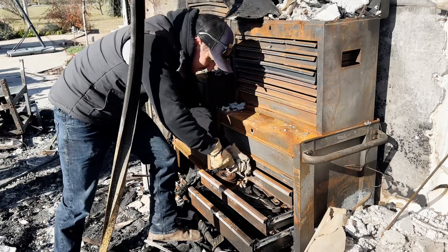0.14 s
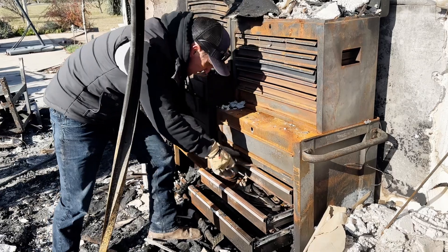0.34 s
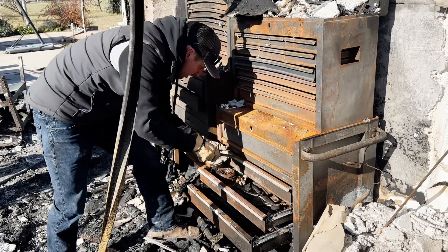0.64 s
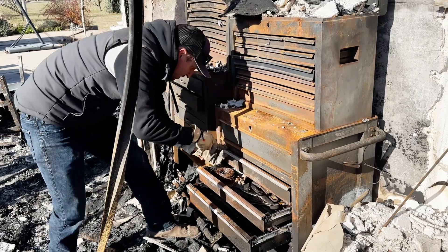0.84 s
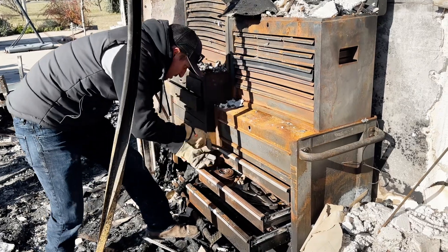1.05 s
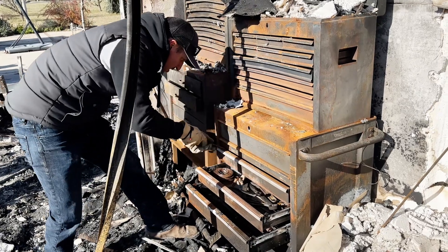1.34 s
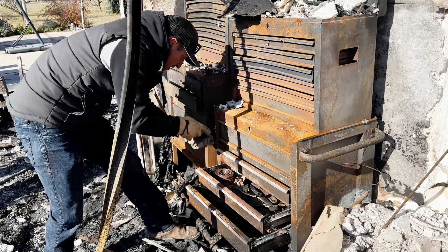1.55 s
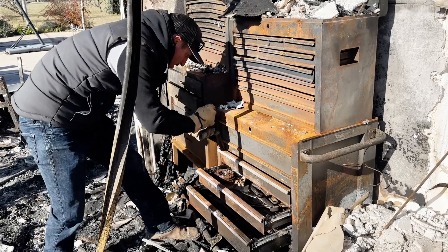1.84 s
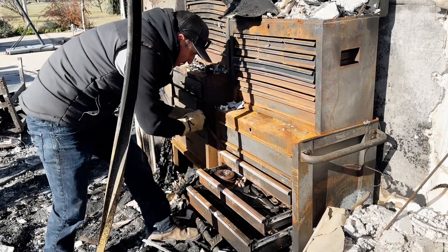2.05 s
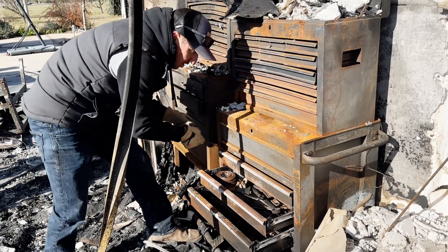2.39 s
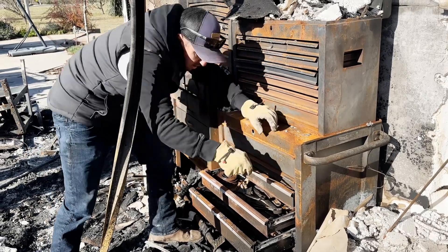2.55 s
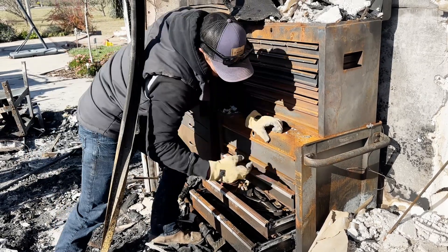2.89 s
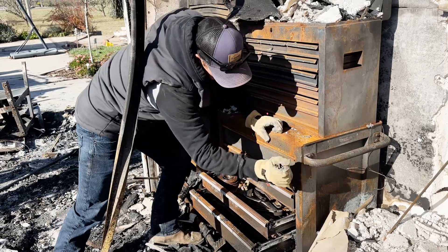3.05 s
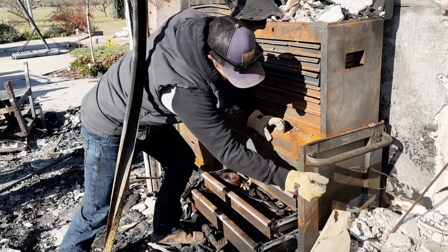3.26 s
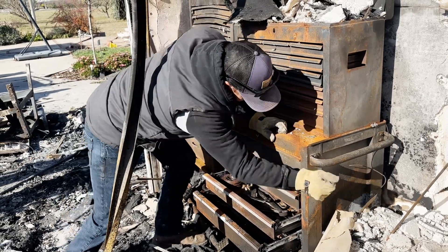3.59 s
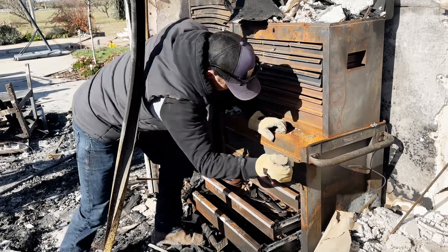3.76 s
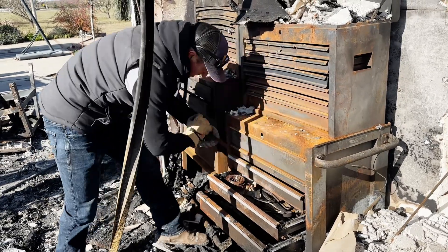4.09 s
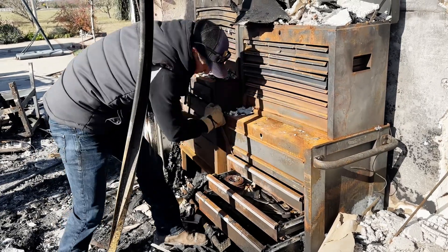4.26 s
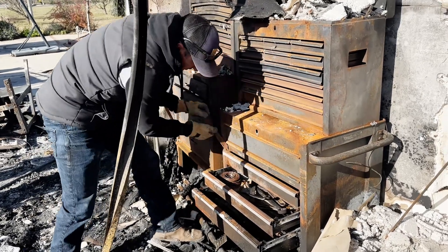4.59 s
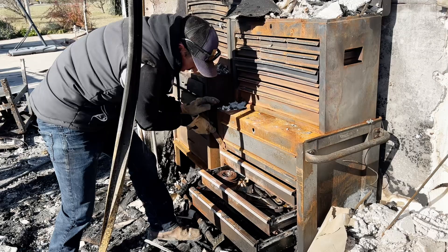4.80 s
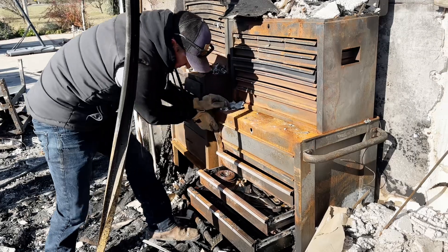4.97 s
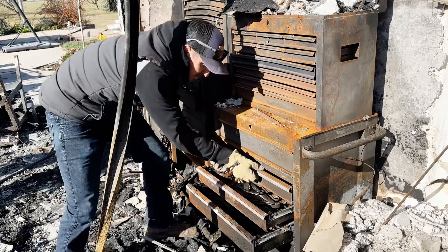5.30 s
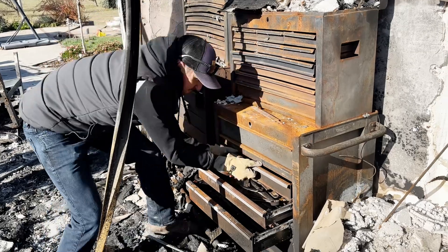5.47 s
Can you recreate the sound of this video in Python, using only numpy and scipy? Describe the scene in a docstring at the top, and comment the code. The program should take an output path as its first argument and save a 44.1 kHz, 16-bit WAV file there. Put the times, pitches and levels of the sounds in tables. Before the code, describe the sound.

Close stereo pickup outdoors of a rusty steel tool chest being searched. From about 0.2 s, gritty scrapes and dull knocks begin, with a short drawer groan near 0.3 s and a bright clink at 0.7 s. Around 1.0 to 1.3 s come a hollow plate-like clink and a sharp clack, then a deep thud at 1.65 s. Lighter scrapes, ticks and knocks continue, including a crisp knock at 2.25 s and a brief juddering groan near 2.85 s. From 3.35 to 3.8 s a stuck drawer is jerked, giving a dense burst of hard clanks, rattles and low thuds. Sparse knocks and faint dragging follow, with a ringing double clack at 5.05 s. At 5.3 s a drawer slams with the loudest booming clank and a short rattle, then small scrapes and knocks. Far traffic murmurs throughout while a distant car fades away.

```python
"""Outdoors, gloved hands rummage through rusty tools in the steel drawers of a tool chest.
Tools drag over grit, knock on the sheet steel and clink; a stuck drawer is jerked several times,
and near the end one is slammed home with a loud clank. Far traffic murmurs and a far car recedes.
Bursts of tiny impacts shake fading steel tones to make the drags, clacks and clinks; plain fading
tones make the booms and thuds, and coloured noise makes the traffic."""
import sys
import numpy as np
from scipy import signal
from scipy.fft import rfft, irfft, next_fast_len
from scipy.io import wavfile

SR = 44100
rng = np.random.default_rng(int(sys.argv[2]) if len(sys.argv) > 2 else 0)


def generate_wav(sig):
    """Save sig (samples, or channels by samples) to the path in sys.argv[1] as 16-bit PCM at SR."""
    pcm = np.round(np.clip(np.atleast_2d(sig).T, -1, 1) * 32767).astype(np.int16)
    wavfile.write(sys.argv[1], SR, pcm)


N = 248679
RING_TIME = np.arange(SR // 4) / SR
SHORT_RING_TIME = RING_TIME[:SR // 10]


def from_db(db):
    """Turn decibels into gain."""
    return 10 ** (np.asarray(db) / 20)


def rms_one(x):
    """Scale to an rms of 1."""
    return x / np.sqrt(np.mean(x ** 2) + 1e-20)


def at_level(x, db):
    """Give a short sound the energy of 40 ms at this level."""
    return x * from_db(db) * np.sqrt(.04 * SR / (np.sum(x ** 2) + 1e-20))


def at_hz(points, hz):
    """Read a table between its points, on a log-frequency axis."""
    f, value = np.transpose(points)
    return np.interp(np.log(hz), np.log(f), value)


def add(out, s, sound):
    """Mix a sound in, starting at s seconds."""
    start = max(0, round(s * SR))
    out[start:start + len(sound)] += sound[:N - start]


def ring(hz, fade_s, time=RING_TIME):
    """A struck tone that falls by 60 dB in fade_s."""
    return np.sin(2 * np.pi * hz * time) * np.exp(-np.log(1000) * time / fade_s)


def coloured(spectrum, size):
    """Noise shaped by a spectrum, with an rms of 1."""
    hz = np.arange(size // 2 + 1) * SR / size + 1
    white = rfft(rng.standard_normal(size))
    return rms_one(irfft(white * from_db(at_hz(spectrum, hz)), size))


def grains(size, per_s, spread_db):
    """Tiny impacts of random sign and uneven strength."""
    born = rng.random(size) < per_s / SR
    extra_db = spread_db * np.minimum(rng.exponential(1, size), 4)
    return born * rng.choice([-1, 1], size) * from_db(extra_db)


def catches(size, per_s, catch_db, release_s=0.002):
    """A moving tool snags on debris: brief surges of force at random moments."""
    snags = (rng.random(size) < per_s / SR) * rng.uniform(.5, 1, size)
    surge = signal.lfilter([1], [1, -np.exp(-1 / (release_s * SR))], snags)
    return 1 + from_db(catch_db) * surge


def contact(length, rise=0.8, fall=0.81, chatter_db=-16, chatter_s=0.02):
    """Rusty steel bites, lets go and chatters on; returns the impacts and the seconds before their peak."""
    lead = .06
    t = np.arange(-lead, .12, 1 / SR)
    # rise and fall are shares of the contact length
    swell = np.exp(-(np.maximum(-t / rise, t / fall) / length) ** 2)
    chatter = from_db(chatter_db) * np.exp(np.minimum(t / rise / length, -t / chatter_s))
    return (swell + chatter) * grains(len(t), per_s=12000, spread_db=3.5), lead


def strike(modes):
    """Each spot on the steel excites the modes with strengths and signs of its own; rms 1."""
    weights = rng.choice([-1, 1], len(modes)) * from_db(2 * rng.standard_normal(len(modes)))
    return rms_one(weights @ modes)


def shaken(force, modes, count=2):
    """Rough steel touches at several spots at once, and each tiny impact lands on one of them."""
    spot = rng.integers(0, count, len(force))
    return sum(signal.fftconvolve(force * (spot == k), strike(modes)) for k in range(count))


# the steel's crowd of short-lived tones: pitch_hz, level_db (per Hz, relative)
STEEL = [(160, -2), (300, 7.5), (600, 0), (950, 2.5), (1250, -5.5), (1550, -20), (1850, -4), (2500, -10.5),
         (3200, -6), (4500, -13), (7500, -17.5), (9500, -14.5), (11300, -31), (13000, -24.5), (15500, -27)]
# how long they last: pitch_hz, fade_s (time to fall 60 dB)
STEEL_FADE = [(200, 0.19), (1000, 0.042), (3000, 0.017), (12000, 0.0055)]


def crowded_modes(band, count):
    """Closely spaced, short-lived steel modes across a band in Hz, one row each."""
    low_hz, high_hz = band
    pitches = low_hz + (np.arange(count) + rng.random(count)) * (high_hz - low_hz) / count
    rows = []
    for hz, fade_s in zip(pitches, at_hz(STEEL_FADE, pitches)):
        # a short-lived mode starts louder, to carry as much energy
        rows.append(from_db(at_hz(STEEL, hz)) * ring(hz, fade_s, SHORT_RING_TIME) / np.sqrt(fade_s))
    return np.array(rows)


# the clear tones of the sheet steel, some long and some short: pitch_hz, level_db (relative), fade_s
PANEL_MODES = [(252, -8.5, 0.35), (290.6, -4.5, 0.25), (344.7, -6.5, 0.3), (422, -13, 0.36),
               (535, -2, 0.019), (616, -19.5, 0.43), (676.7, -4, 0.08), (780, 2, 0.055), (857, -3.5, 0.061)]


def sheet_modes():
    """The clear modes of the sheet steel panels, one row each."""
    return np.array([from_db(db) * ring(hz, fade_s) for hz, db, fade_s in PANEL_MODES])


# tones of the drawer body, under hard blows and, faintly, dragged tools: pitch_hz, level_db (relative)
DRAWER_MODES = [(690, 7.5), (1035, 2), (1820, -9.5), (2920, -6), (3110, 0.5), (3780, -2.5), (4580, -12),
                (5250, -6), (6320, -13), (8550, -9)]


def drawer_modes(fade_s=.06):
    """The clear modes of the drawer body, one row each."""
    return np.array([from_db(db) * ring(hz, fade_s, SHORT_RING_TIME) for hz, db in DRAWER_MODES])


# colour of the street's murmur: pitch_hz, level_db (per Hz, relative)
STREET = [(25, -17.5), (64, -2), (127, -7.5), (212, -16), (439, -22.5), (900, -22), (1500, -35.5),
          (2900, -42.5), (8000, -51.5), (16000, -79.5)]
STREET_DB = -41.5


def street(side_db=-5, bass_side_db=-12, wide_hz=700):
    """Far traffic is noise, nearly alike at both ears in the bass and wider above."""
    noise = coloured(STREET, size=next_fast_len(N))[:N]
    wide = signal.sosfilt(signal.butter(1, wide_hz, "high", fs=SR, output="sos"), noise)
    side = from_db(bass_side_db) * (noise - wide) + from_db(side_db) * wide
    middle = coloured(STREET, size=next_fast_len(N))[:N]
    return from_db(STREET_DB) * (middle + np.array([side, -side]))


# colour of the far car: pitch_hz, level_db (per Hz, relative)
CAR = [(550, -27.5), (880, -0.5), (1250, -14), (1520, -15), (1750, -17.5), (3300, -32.5), (12000, -49.5)]
CAR_START_DB, CAR_FADE_DB_PER_S = -46.5, 4


def car(waver_db=-1.0, wavers_per_s=7, side_db=-7):
    """Tyre noise wavers in level as it fades into the distance."""
    t = np.arange(N) / SR
    waver = np.interp(t * wavers_per_s, np.arange(100), rng.standard_normal(100))
    middle, side = (coloured(CAR, size=next_fast_len(N))[:N] for _ in range(2))
    gain = from_db(CAR_START_DB - CAR_FADE_DB_PER_S * t + waver_db * waver)
    return gain * (middle + from_db(side_db) * np.array([side, -side]))


# a hand drags things along a drawer: start_s, end_s, rasp_db
SCRAPES = [(0.22, 0.333, -55), (0.5, 0.555, -32.5), (0.571, 0.638, -39.5), (0.806, 0.921, -46.5),
           (0.935, 1.084, -46.5), (1.165, 1.258, -35.5), (1.256, 1.36, -44.5), (1.385, 1.568, -51),
           (1.57, 1.671, -43), (1.799, 1.841, -41.5), (2.017, 2.053, -41.5), (1.902, 1.984, -53.5),
           (2.381, 2.499, -59), (2.74, 2.77, -44), (2.83, 2.949, -47), (3.036, 3.072, -43),
           (3.099, 3.147, -44.5), (3.233, 3.263, -40.5), (3.377, 3.92, -53.5), (4.343, 4.375, -45),
           (4.383, 4.465, -56.5), (4.704, 4.999, -54), (5.006, 5.067, -38), (5.29, 5.335, -36.5),
           (5.434, 5.663, -48.5)]
# the panel rumble grows more slowly than the rasp as the hand presses harder
USUAL_RASP_DB, USUAL_RUMBLE_DB, RUMBLE_FOLLOWS = -44.5, -36, 0.67
# the tool skids just before and after each blow, at levels set against the blow's own
SKID_BEFORE_S, SKID_AFTER_S, SKID_RUMBLE_DB, SKID_RASP_DB = .008, 0.04, -10, -16


def strokes():
    """The long drags, whose rumble follows their rasp: start_s, end_s, rumble_db, rasp_db."""
    rows = []
    for start, end, rasp in SCRAPES:
        rumble = USUAL_RUMBLE_DB + RUMBLE_FOLLOWS * (rasp - USUAL_RASP_DB)
        rows.append((start, end, rumble, rasp))
    return rows


def skids():
    """The short slide around each blow: start_s, end_s, rumble_db, rasp_db."""
    return [(s - SKID_BEFORE_S, s + SKID_AFTER_S, panel_db + SKID_RUMBLE_DB, clack_db + SKID_RASP_DB)
            for s, _, panel_db, clack_db in KNOCKS]


def dragging(panel, clack, grit, rumble_db=-2.0, rasp_db=-1.0, grit_db=-6.0, sheet_db=-6.0,
             drawer_db=-7, edge_s=0.008, fade_db=2.2):
    """Sliding over rust and grit: dense grains, sticking and slipping, shake the steel."""
    out, sheet, drawer = np.zeros(N), sheet_modes(), drawer_modes()
    for start, end, rumble, rasp in strokes() + skids():
        t = np.arange(start - .05, end + .05, 1 / SR)
        # a stroke swells, loses pressure as it goes, and stops
        swell = (1 + np.tanh((t - start) / edge_s / 2)) / 2
        stop = (1 + np.tanh((end - t) / edge_s / 2)) / 2
        stroke = swell * stop * from_db(-fade_db * (t - start) / (end - start))
        force = grains(len(t), per_s=14000, spread_db=3)
        force = force * catches(len(t), per_s=130, catch_db=6)
        # the drawer is shaken twice, each time at fresh spots
        parts = [(sheet, rumble + sheet_db), (panel, rumble + rumble_db),
                 (drawer, rasp + drawer_db), (drawer, rasp + drawer_db),
                 (clack, rasp + rasp_db), (grit, rasp + grit_db)]
        for modes, db in parts:
            sound = shaken(force * stroke, modes)
            add(out, t[0], from_db(db) * sound * np.linalg.norm(stroke) / np.linalg.norm(sound))
    return out


# small bits of metal click against each other: start_s, level_db
TICKS = [(0.576, -42), (1.407, -50.5), (1.626, -45), (1.711, -50.5), (1.772, -49.5), (2.011, -48),
         (2.243, -43), (2.395, -57.5), (2.67, -49.5), (2.801, -51), (3.601, -48), (3.786, -38.5),
         (4.123, -51), (4.397, -49), (4.58, -53), (4.659, -50), (4.751, -49.5), (5.017, -42), (5.181, -47)]
TICK_CONTACT_S, TICK_GRIT_DB = 0.0016, -10
STRAY_TICKS_PER_S, STRAY_TICK_DB = 22, -2


def stray_ticks():
    """Screws and sockets nudged by a stroke tick at random, unevenly strong: start_s, level_db."""
    rows = []
    for start, end, rasp in SCRAPES:
        count = round((end - start) * STRAY_TICKS_PER_S)
        for when, weakness in rng.random((count, 2)):
            db = min(rasp, USUAL_RASP_DB) + STRAY_TICK_DB - 10 * weakness
            rows.append((start + (end - start) * when, db))
    return [row for row in rows if row[0] < N / SR]


def ticks(clack, grit):
    """A light, very short contact sounds only the high modes."""
    out = np.zeros(N)
    for s, level in TICKS + stray_ticks():
        impacts, lead = contact(TICK_CONTACT_S, rise=0.42, fall=1.0, chatter_db=-15, chatter_s=0.011)
        for modes, db in [(clack, level), (grit, level + TICK_GRIT_DB)]:
            add(out, s - lead, at_level(shaken(impacts, modes), db))
    return out


# loose pieces tumble during a stroke: rate, levels against the stroke, spread either way, panel pitches
TAPS_PER_S, TAP_RUMBLE_DB, TAP_RASP_DB, TAP_SPREAD_DB, TAP_HZ = 6, -2.5, 1.5, 5, (246, 679)


def taps():
    """Uneven blows from pieces that a stroke tips over: start_s, pitch_hz, panel_db, clack_db."""
    rows = []
    for start, end, rumble, rasp in strokes():
        count = round((end - start) * TAPS_PER_S)
        for k, (when, spot, force) in enumerate(rng.random((count, 3))):
            db = TAP_SPREAD_DB * (2 * force - 1)
            s = start + (end - start) * (k + when) / count
            hz = np.interp(spot, (0, 1), TAP_HZ)
            rows.append((s, hz, rumble + TAP_RUMBLE_DB + db, rasp + TAP_RASP_DB + db))
    return [row for row in rows if row[0] < N / SR]


# a harder blow has a shorter contact and crunches more rust
USUAL_CLACK_DB, USUAL_CONTACT_S, CONTACT_SHORTENS = -39.5, 0.006068, .17
GRIT_BELOW_CLACK_DB, GRIT_PER_HARDNESS = 4.5, 0.33


def blows():
    """All knocks and taps: start_s, contact_s, pitch_hz, panel_db, clack_db, grit_db."""
    rows = []
    for s, hz, panel_db, clack_db in KNOCKS + taps():
        length = USUAL_CONTACT_S * from_db(CONTACT_SHORTENS * (USUAL_CLACK_DB - clack_db))
        grit_db = clack_db - GRIT_BELOW_CLACK_DB + GRIT_PER_HARDNESS * (clack_db - panel_db)
        rows.append((s, length, hz, panel_db, clack_db, grit_db))
    return rows


# blows on the drawers: start_s, pitch_hz (main panel tone), panel_db, clack_db
KNOCKS = [(0.313, 288, -38.5, -53), (0.637, 345, -37.5, -65), (0.708, 291, -34.5, -39),
          (1.024, 813, -34.5, -39), (1.075, 790, -43, -42.5), (1.223, 810, -39, -26.5),
          (1.317, 495, -39, -42.5), (1.479, 531, -37, -47), (1.532, 318, -36, -44.5),
          (1.586, 537, -33, -44.5), (1.649, 1062, -25, -41.5), (1.805, 305, -35, -42.5),
          (2.011, 693, -38, -53.5), (2.253, 566, -34, -32.5), (2.304, 368, -34.5, -40.5),
          (2.509, 230, -41, -50.5), (2.646, 350, -30, -44), (2.835, 264, -37.5, -40),
          (2.862, 307, -37.5, -47), (3.052, 694, -36, -38.5), (3.223, 630, -35.5, -52.5),
          (3.351, 823, -31, -42), (3.448, 367, -22, -28.5), (3.528, 616, -24.5, -25),
          (3.541, 794, -25, -27), (3.62, 698, -20, -26), (3.707, 940, -21, -26), (3.759, 883, -30, -40),
          (3.775, 250, -31.5, -30.5), (4.14, 296, -39, -49.5), (4.152, 514, -40, -52),
          (4.193, 694, -36.5, -46.5), (4.211, 740, -40.5, -57), (4.361, 723, -29, -36.5),
          (4.414, 913, -40, -43.5), (4.56, 397, -40.5, -49), (4.79, 258, -37.5, -45.5),
          (4.883, 816, -40.5, -47.5), (5.037, 316, -27.5, -33.5), (5.053, 520, -28.5, -35.5),
          (5.291, 341, -18, -24.5), (5.469, 273, -33.5, -46.5), (5.558, 760, -35, -44),
          (5.637, 760, -35, -38)]


def knocks(panel, clack, grit, sheet_db=-6, main_db=-4.0, crowd_db=-1.5, main_fade_s=0.051, push_s=0.0008):
    """Each blow booms in the panel that it hits, clacks in the tool and crunches the rust."""
    out, sheet = np.zeros(N), sheet_modes()
    push = 1 - np.exp(-RING_TIME / push_s)
    for s, length, hz, panel_level, clack_level, grit_level in blows():
        # the weight of the tool gives the panel one push
        boom = at_level(push * ring(hz, main_fade_s), main_db)
        boom = boom + at_level(push * strike(sheet), sheet_db)
        add(out, s - .002, from_db(panel_level) * boom)
        # the rough contact rattles all the higher modes
        impacts, lead = contact(length)
        for modes, db in [(panel, panel_level + crowd_db), (clack, clack_level), (grit, grit_level)]:
            add(out, s - lead - .0015, at_level(shaken(impacts, modes), db))
    return out


# a drawer judders along its runners: start_s, end_s, level_db
GROANS = [(0.313, 0.37, -37.5), (2.84, 2.875, -32.5), (2.892, 2.935, -31)]
GROAN_HZ = 267


def groans(fade_s=0.027, jitter=0.091):
    """The runner sticks and slips in step with the drawer floor, a little unevenly."""
    out = np.zeros(N)
    for start, end, db in GROANS:
        slips = np.zeros(round((end - start) * SR))
        when = np.cumsum(1 + jitter * rng.standard_normal(size=40)) * SR / GROAN_HZ
        slips[when[when < len(slips)].astype(int)] = 1
        add(out, start, at_level(signal.fftconvolve(slips, ring(GROAN_HZ, fade_s)), db))
    return out


# a blow rocks the heavy chest only a little: level against the blow, and its upper limit
KNOCK_JOLT_DB, KNOCK_JOLT_LIMIT_DB = -8.5, -36


def jolts(low_hz=70, high_hz=105):
    """What each knock passes on to the whole chest: start_s, pitch_hz, level_db."""
    return [(s, rng.uniform(low_hz, high_hz), min(panel_db + KNOCK_JOLT_DB, KNOCK_JOLT_LIMIT_DB))
            for s, _, panel_db, _ in KNOCKS]


# the chest shifts under the weight of the arms, or the jerked drawer meets its stop:
# start_s, pitch_hz, level_db
THUDS = [(0.324, 118, -30), (0.832, 87, -35), (1.649, 46, -23.5), (1.83, 94, -31), (2.079, 61.5, -33),
         (3.351, 84, -36.5), (3.394, 104, -29), (3.454, 88, -25), (3.547, 78, -23), (3.642, 74.5, -25.5),
         (3.722, 91, -31), (4.5, 51, -38.5), (5.295, 93, -30)]
DRAWER_FADE_S, FRAME_FADE_S, WALL_FADE_S = .12, .35, .02


def thuds(frame_hz=75, frame_db=-5, wall_hz=125, wall_db=-5):
    """A jolt rocks the drawer, the frame and a side wall, each with a low tone."""
    out, time = np.zeros(N), np.arange(SR) / SR
    for s, hz, db in THUDS + jolts():
        add(out, s, at_level(ring(hz, DRAWER_FADE_S, time), db))
        frame = ring(frame_hz * rng.uniform(0.86, 1.15), FRAME_FADE_S, time)
        add(out, s, at_level(frame, db + frame_db))
        # the wall swings against the drawer, so the deepest bass partly cancels
        wall = -ring(wall_hz * rng.uniform(1.0, 1.07), WALL_FADE_S, time)
        add(out, s, at_level(wall, db + wall_db))
    return out


# what each loose tool, or a panel plate that rings out, rings with, by name: pitch_hz, level_db (relative)
TOOLS = {"wrench": [(2880, 1.5), (3330, -16), (3765, 1), (4230, -7), (5200, -9.5), (6325, -15), (7820, -18),
         (9400, -12.5)], "socket": [(3570, 1), (5220, -0.5), (5430, -11), (7100, 5.5), (8970, -4.5)],
         "runner": [(2790, 3.5), (3150, 21), (5710, 3.5)], "pliers": [(2500, 6), (3850, -9)],
         "plate": [(829, 0), (2202, -11.5)]}
# ring time of the lowest tone of each tool or plate, by name: fade_s
TOOL_FADE = {"wrench": .15, "socket": .06, "runner": .018, "pliers": .09, "plate": .06}
# a tool or a panel plate is set ringing: start_s, tool (name), contact_s, level_db
CLINKS = [(0.702, "runner", 0.00044, -38.5), (0.846, "wrench", 0.045, -44.5), (1.024, "plate", 0.0021, -27),
          (2.742, "socket", 0.011, -36), (3.252, "wrench", 0.0033, -40), (3.508, "runner", 0.0022, -29.5),
          (4.413, "plate", 0.003, -39), (5.048, "wrench", 0.012, -41.5), (5.177, "pliers", 0.0048, -47)]


def clinks():
    """A tool that comes free, or a panel plate that is struck, rings with its own clear modes; the higher ones
    die sooner."""
    out = np.zeros(N)
    for s, tool, length, db in CLINKS:
        impacts, lead = contact(length)
        lowest_hz = TOOLS[tool][0][0]
        tone = 0
        for hz, level in TOOLS[tool]:
            mode = ring(hz, TOOL_FADE[tool] * lowest_hz / hz)
            tone = tone + at_level(signal.fftconvolve(impacts, mode), level)
        add(out, s - lead, at_level(tone, db))
    return out


# after a hard blow the loose tools bounce on for a moment
HARD_CLACK_DB = -31
BOUNCE_GAP_S, BOUNCE_DB, BOUNCE_LOSS_DB = .014, -23, 5.5


def clanks(clack, ring_db=-4):
    """A hard blow rings the drawer body, and the tools in it bounce unevenly, weaker each time."""
    out, drawer = np.zeros(N), drawer_modes()
    for s, _, _, level in KNOCKS:
        if level > HARD_CLACK_DB:
            add(out, s, at_level(strike(drawer), level + ring_db))
            gaps = BOUNCE_GAP_S * np.cumsum(.5 + rng.random(size=4))
            for k, gap in enumerate(gaps):
                impacts, lead = contact(TICK_CONTACT_S)
                bounce = shaken(impacts, clack) + shaken(impacts, drawer)
                add(out, s + gap - lead, at_level(bounce, level + BOUNCE_DB - BOUNCE_LOSS_DB * k))
    return out


# tones of the drawer that is slammed home: pitch_hz, level_db (relative), fade_s
SLAM_MODES = [(306, -7, .13), (349, 0, .16), (428, -7, .08), (512, -10, .07), (582, -9, .1), (690, -8, .1),
              (755, -10, .1), (856, -12, .12), (1010, -8, .09), (1244, -15, .09)]
SLAM_S, SLAM_DB = 5.2885, -14.5


def slam(panel, clack, buzz_db=-9, rattle_db=-16, rattle_fade_s=0.16):
    """The slammed drawer clangs, and the tools in it keep bouncing on its floor as the clang dies."""
    out = np.zeros(N)
    clang = 0
    for k, (hz, db, fade_s) in enumerate(SLAM_MODES):
        clang = clang + (-1) ** k * at_level(ring(hz, fade_s), db)
    add(out, SLAM_S, at_level(clang, SLAM_DB))
    size = len(RING_TIME)
    bounces = grains(size, per_s=5000, spread_db=2.5) * catches(size, per_s=140, catch_db=9)
    bounces = bounces * from_db(-60 * RING_TIME / rattle_fade_s)
    # the heavy tools rattle more dully than a single sharp blow
    dull = signal.sosfilt(signal.butter(2, 1700, fs=SR, output="sos"), bounces)
    for force, modes, db in [(bounces, panel, buzz_db), (dull, clack, rattle_db)]:
        add(out, SLAM_S, at_level(shaken(force, modes), SLAM_DB + db))
    return out


def surroundings(x, fade_s=0.12, echo_db=-13, dull_hz=6500):
    """The hollow chest and the wall behind it scatter a short tail, different at each ear."""
    decay = np.exp(-np.log(1000) * RING_TIME / fade_s) * (RING_TIME > .002)
    tail = rng.standard_normal((2, len(RING_TIME))) * decay
    tail /= np.linalg.norm(tail, axis=1, keepdims=True)
    tail = signal.sosfilt(signal.butter(2, dull_hz, fs=SR, output="sos"), tail)
    tail = signal.sosfilt(signal.butter(1, 900, "high", fs=SR, output="sos"), tail)
    return from_db(echo_db) * signal.fftconvolve(x[None], tail, axes=1)[:, :N]


# how far left leads right at the two microphone ports: pitch_hz, lead_radians
PORT_PHASE = [(100, 0), (2100, .2), (3400, 1), (6200, 1.05), (7600, 2.1), (8200, -.4), (9500, -1.3),
              (10800, -3.1), (11500, -3.2), (12800, -4.5), (14000, -6.28)]
# how much louder left is than right: pitch_hz, level_db
PORT_BALANCE = [(300, 0), (750, 3.5), (1300, 7), (2400, 3), (3200, -2.5), (4800, 4), (7600, 0.5)]


def placed(x):
    """Sound from the chest reaches the two ports with a lag and level that depend on pitch."""
    size = next_fast_len(N + SR // 10)
    hz = np.arange(size // 2 + 1) * SR / size + 1
    # each side takes half of the difference
    lean = from_db(at_hz(PORT_BALANCE, hz) / 2) * np.exp(.5j * at_hz(PORT_PHASE, hz))
    return irfft(rfft(x, size) * np.array([lean, 1 / lean]), size)[:, :N]


PANEL_BAND_HZ, CLACK_BAND_HZ, GRIT_BAND_HZ = (150, 1300), (1300, 6000), (6000, 16500)


def scene():
    """All the handling sounds come from the chest, over the street and the far car."""
    panel = crowded_modes(PANEL_BAND_HZ, count=70)
    clack = crowded_modes(CLACK_BAND_HZ, count=160)
    grit = crowded_modes(GRIT_BAND_HZ, count=220)
    parts = [dragging(panel, clack, grit) + groans(),
             ticks(clack, grit) + clinks(),
             knocks(panel, clack, grit),
             clanks(clack),
             slam(panel, clack)]
    # each part comes from its own spot, so the nearby drawer fronts reflect it differently
    near = sum(surroundings(part, fade_s=.03, echo_db=-8, dull_hz=15000) for part in parts)
    chest = sum(parts) + thuds()
    return placed(chest) + near + surroundings(chest) + street() + car()


CUTOFF_HZ = 15900


def record(dry):
    """Peaks are rounded and the top of the treble is cut."""
    rounded = 1.3 * np.tanh(dry / 1.3)
    return signal.sosfilt(signal.ellip(10, .1, 80, CUTOFF_HZ, fs=SR, output="sos"), rounded)


dry = scene()
out = record(dry)
generate_wav(out)
```